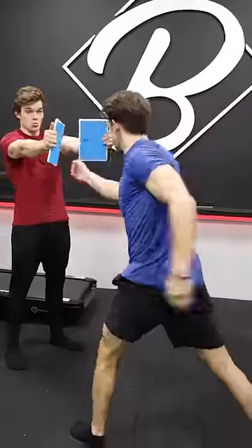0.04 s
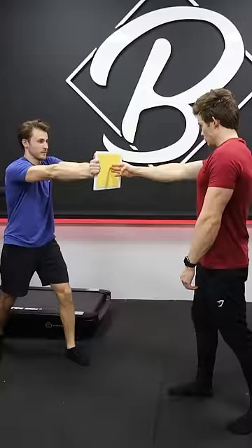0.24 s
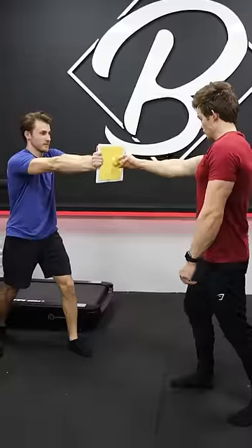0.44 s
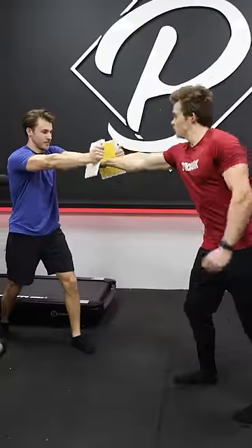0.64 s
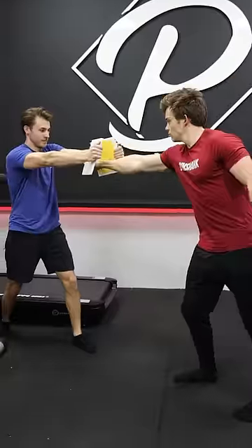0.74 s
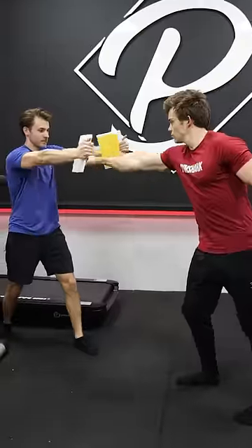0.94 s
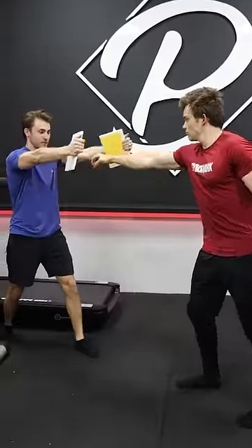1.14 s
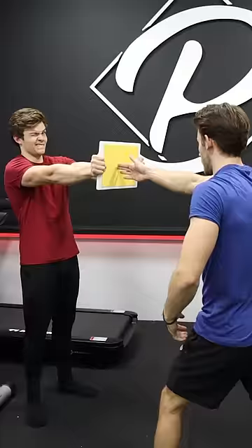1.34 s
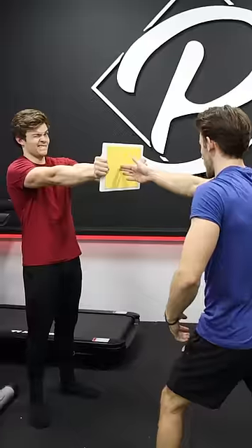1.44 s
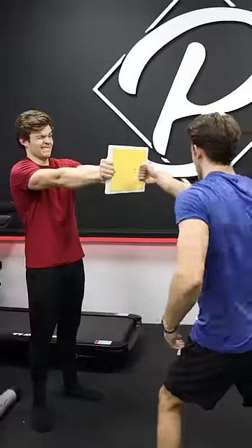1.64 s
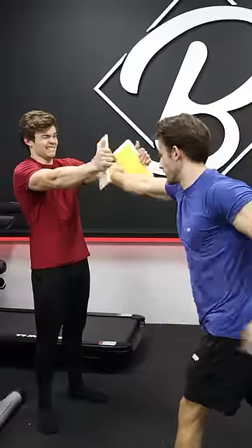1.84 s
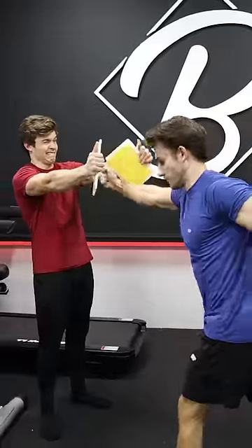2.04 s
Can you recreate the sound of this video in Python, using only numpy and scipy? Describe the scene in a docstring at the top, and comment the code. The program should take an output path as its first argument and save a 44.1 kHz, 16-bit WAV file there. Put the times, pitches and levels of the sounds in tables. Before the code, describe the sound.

Two wooden boards crack under punches in an echoing gym. First a faint echo fades and cuts off at 0.3 seconds as feet shift over a ventilation hum. At 0.6 seconds a fist thuds and a board snaps, splintering with a brief hollow ring. After a clothing rustle and light pat, the second board breaks at 1.8 seconds, followed by two soft steps around 2 seconds.

```python
"""Two wooden practice boards are punched in half in a reverberant gym. First, over a ventilation hum,
the echo of an earlier break dies away and is cut off while feet shift on the mats. At 0.6 s a fist
thuds, the bent board snaps, fibres splinter and the freed halves ring. The snap overloads a gain
control, which holds up the echo as it recovers. After a rustling wind-up and a pat on the board,
the second breaks the same way at 1.8 s, and two steps follow."""
import sys
import numpy as np
from scipy import signal
from scipy.fft import rfft, irfft, next_fast_len
from scipy.io import wavfile
from scipy.ndimage import map_coordinates

SR = 44100
rng = np.random.default_rng(int(sys.argv[2]) if len(sys.argv) > 2 else 0)


def generate_wav(signal):
    """Clip the signal to [-1, 1] and save it as 16-bit WAV at the path in sys.argv[1]."""
    frames = np.transpose(np.atleast_2d(signal))
    scaled = np.clip(frames, -1, 1) * 32767
    pcm = np.round(scaled).astype(np.int16)
    wavfile.write(sys.argv[1], SR, pcm)


N = 92698
TIME = np.arange(N) / SR
HIT = np.arange(SR // 4) / SR  # time within one impact

# each board gives way: t/s, snap/dB, splinter/dB, ring/dB, air push/dB, pitch ratio
FRACTURES = [(0.6410, 15.5, 4, 3.5, -6, 1.0), (1.8116, 14.5, 7.5, 4.5, -5, 1.001)]


def amp(db):
    """Amplitude ratio of a level in decibels."""
    return 10 ** (np.asarray(db) / 20)


def unit(x):
    """Normalisation to rms 1."""
    return x / np.sqrt(np.mean(x ** 2) + 1e-20)


def along(points, hz):
    """Interpolation of (f/Hz, value) points on a logarithmic frequency axis."""
    f, v = np.transpose(points)
    return np.interp(np.log(hz + 1), np.log(f + 1), v)


def fade(t, t60):
    """Exponential decay by 60 dB in t60 seconds."""
    return amp(-60 * t / t60)


def lowpass(f, corner_hz, order=2):
    """Butterworth magnitude response."""
    return 1 / np.sqrt(1 + (f / corner_hz) ** (2 * order))


def filtered(x, response):
    """Zero-phase filtering: the spectrum of x times a gain of frequency."""
    m = next_fast_len(len(x) + 8192)
    return irfft(rfft(x, m) * response(np.fft.rfftfreq(m, 1 / SR)), m)[:len(x)]


def noise(colour, dull_hz=np.inf, size=N):
    """Spectrally shaped noise of rms 1, softened above dull_hz."""
    white = rng.standard_normal(size)
    return unit(filtered(white, lambda f: amp(along(colour, f)) * lowpass(f, dull_hz)))


def at(s, x):
    """Pure delay of x by s seconds."""
    return np.pad(x, (max(round(s * SR), 0), N))[:N]


def burst(colour, t60, rise_s, dull_hz=np.inf):
    """A broadband transient: noise that rises and dies, with the energy of its envelope."""
    envelope = fade(HIT, t60) * (1 - np.exp(-HIT / rise_s))
    return unit(noise(colour, dull_hz, size=len(HIT)) * envelope) * np.sqrt(np.mean(envelope ** 2))


def ring(hz, t60, size=SR // 4):
    """Free vibration of one damped mode."""
    return np.sin(2 * np.pi * hz * TIME[:size]) * fade(TIME[:size], t60)


def room_tone(waver_db=2.5, waver_per_s=14):
    """Random amplitude modulation makes the ventilation hum waver over a faint rumble and hiss."""
    tones = [(91.5, -66), (183, -77), (237, -77), (382, -79)]  # ventilation: f/Hz, level/dB
    floor = [(12, -35.5), (20, -4), (60, -5), (96, 1), (113, -6.5), (270, -19), (377, -20), (410, -28),
             (976, -30), (1090, -40), (1190, -32), (1330, -40.5), (16000, -35.5)]  # background spectrum: f/Hz, density/dB
    hum = np.zeros(N)
    for hz, db in tones:
        waver = map_coordinates(rng.standard_normal(128), [TIME * waver_per_s], mode="wrap")
        tone = np.sqrt(2) * np.sin(2 * np.pi * (hz * TIME + rng.random()))
        hum += amp(db + waver_db * waver) * tone
    return hum + amp(-61) * noise(floor)


def earlier_echo(cutoff_s=0.31):
    """Free decay of the room after an earlier break: a wash and a low boom that stop abruptly."""
    colour = [(100, -23), (400, -29), (560, -2), (720, -10.5), (950, -3.5), (2200, -7.5), (3500, 0),
              (5500, -9), (8300, -13.5), (10500, -27.5), (15000, -64)]  # spectrum of the wash: f/Hz, density/dB
    resonances = [(1006, 40, 6), (1547, 180, 10.4), (2870, 180, 11.6), (4520, 440, 14.8), (6360, 670, 9.7),
                  (8530, 300, 8)]  # its peaks: f/Hz, width/Hz, gain/dB
    room_modes = [(91, -46.5, 1.65), (136, -50.5, 2.4), (146, -50, 1.25)]  # low boom: f/Hz, level/dB, t60/s
    peaks = lambda f: amp(sum(db / (1 + (2 * (f - hz) / width) ** 2) for hz, width, db in resonances))
    wash = amp(-37) * unit(filtered(noise(colour), peaks)) * fade(TIME, t60=0.74)
    boom = sum(amp(db) * ring(hz, t60, size=N) for hz, db, t60 in room_modes)
    return (wash + boom) * np.clip((cutoff_s - TIME) / 0.0029, 0, 1)


def footsteps():
    """Soft contact: feet on the mats give slowly rising thuds with little treble."""
    steps = [(0.0, -43.5, 110), (0.083, -50, 120), (0.218, -54, 110), (1.405, -60.5, 900),
             (1.621, -61, 700), (1.925, -36, 90.5), (1.986, -25, 648)]  # footfalls: t/s, level/dB, low-pass corner/Hz
    colour = [(30, -16.5), (100, -1.5), (250, -6.5), (600, 1.5), (3000, 2), (15000, -20)]  # footfall spectrum: f/Hz, density/dB
    return sum(at(s, amp(db) * burst(colour, t60=0.22, rise_s=.005, dull_hz=hz)) for s, db, hz in steps)


def rustle():
    """Friction noise of clothes swells with each wind-up."""
    envelope = [(0, -82), (.5, -74), (.61, -72.5), (.7, -81.5), (1.35, -82), (1.43, -70), (1.58, -70.5),
                (1.73, -63.5), (1.79, -61.5), (1.85, -76)]  # course of the rustle: t/s, level/dB
    cloth = [(100, -3), (500, 2.5), (1500, -4), (3800, -8.5), (6000, -12), (15000, -28.5)]  # its spectrum: f/Hz, density/dB
    return amp(np.interp(TIME, *np.transpose(envelope))) * noise(cloth)


def gym(x, gain_db=-4.5, build_s=0.0077):
    """Diffuse reverberation builds quickly and decays at a rate that depends on frequency."""
    decay = [(100, 0.9), (300, 0.6464), (480, 0.2158), (700, 0.5875), (2000, 0.7072), (3700, 0.6924),
             (6000, 0.6623), (9000, 0.5436), (14000, 0.47)]  # reverberation time: f/Hz, t60/s
    colour = [(60, -13), (180, -12.5), (420, -2.5), (700, -1), (1200, -1), (2300, -5.5), (3500, -2.5),
              (6000, -3.5), (9000, -3.5), (15000, -13)]  # spectrum of the echo: f/Hz, gain/dB
    hz, t, spectra = signal.stft(rng.standard_normal(SR), SR, nperseg=256)
    spectra = spectra * fade(t, along(decay, hz)[:, None])
    tail = signal.istft(spectra, SR, nperseg=256)[1][:SR]
    tail = tail * (1 - np.exp(-TIME[:SR] / build_s))
    tail = filtered(tail / np.linalg.norm(tail), lambda f: amp(gain_db + along(colour, f)))
    return signal.fftconvolve(x, tail)[:N]


def punches():
    """Impact noise: the fist thuds and its skin slaps just before the board gives."""
    blows = [(0.6205, -24, 850, -36), (1.7990, -14, 2200, -30)]  # fist meets board: t/s, thud/dB, thud low-pass corner/Hz, slap/dB
    thud_colour = [(40, -14), (200, -0.5), (600, -2.5), (1500, 2), (3000, -0.5), (5000, -11),
                   (16000, -11.5)]  # thud spectrum: f/Hz, density/dB
    slap_colour = [(200, -9), (1500, 0.5), (3500, 4), (6000, -4.5), (9000, -12.5), (16000, -26.5)]  # slap spectrum: f/Hz, density/dB
    out = np.zeros(N)
    for s, thud_db, hz, slap_db in blows:
        thud = amp(thud_db) * burst(thud_colour, t60=0.074, rise_s=.0006, dull_hz=hz)
        slap = amp(slap_db) * burst(slap_colour, t60=0.068, rise_s=.0005)
        out += at(s, thud + slap)
    return out


def knuckles():
    """Impulse excitation: a hard knock within each punch starts a low flexural vibration."""
    contacts = [(0.6233, -16.5, 680), (1.7998, -5, 1340)]  # knuckles bottom out: t/s, level/dB, f/Hz
    flex_modes = [(45, -27, 0.074), (219, -14, 0.044), (418, -15, .05)]  # bent board and holder's arms: f/Hz, level re knock/dB, t60/s
    flex = sum(amp(db) * ring(hz, t60) for hz, db, t60 in flex_modes)
    return sum(at(s, amp(db) * (ring(hz, t60=.009) + flex)) for s, db, hz in contacts)


def splinters(fibres_per_s=5000, spread_db=4):
    """Shot noise: wood fibres tear in a dense, fading run of random clicks."""
    colour = [(100, -15), (400, -10.5), (1000, -5.5), (2000, -2), (3500, -0.5), (5000, -5.5), (7000, -11.5),
              (10000, -21), (16000, -32.5)]  # click spectrum: f/Hz, density/dB
    n = len(HIT)
    tears = rng.random(n) < fibres_per_s / SR
    clicks = tears * rng.choice([-1, 1], n) * amp(spread_db * rng.standard_normal(n))
    return unit(filtered(clicks, lambda f: amp(along(colour, f)))) * fade(HIT, t60=.1)


def breaks(low_cut_hz=170.3):
    """Brittle fracture: each board snaps, splinters, shoves the air and leaves its halves ringing."""
    modes = [(587, -9.5, 0.071), (656, -6, 0.17), (1219.7, -10.5, 0.045), (1487.5, -16, 0.036),
             (1886, 2.5, 0.023), (1946, 1, 0.043), (2590, -2.5, 0.056), (2782, -2.5, 0.035),
             (3264, 3, .015), (3430, -4.5, .025), (3730, 0, .025), (4620, -11.5, 0.024), (5060, -14, .025)]  # ring of the halves: f/Hz, level/dB, t60/s
    snap_colour = [(100, -12), (500, -10), (1500, -10), (2400, -11), (3400, 5.5), (4600, -7), (7000, -13),
                   (10000, -22.5), (16000, -27)]  # snap spectrum: f/Hz, density/dB
    # a high-pass thins everything in the crack below about 170 Hz
    low_cut = signal.butter(2, low_cut_hz, "high", fs=SR, output="sos")
    out = np.zeros(N)
    for s, snap_db, splinter_db, ring_db, push_db, pitch in FRACTURES:
        halves = sum(rng.choice([-1, 1]) * amp(db) * ring(hz * pitch, t60) for hz, db, t60 in modes)
        halves = halves * (1 - np.exp(-HIT / 0.00073))
        snap = amp(snap_db) * burst(snap_colour, t60=.01, rise_s=0.000461)
        push = amp(push_db) * ring(hz=194, t60=.03)
        crack = snap + amp(splinter_db) * splinters() + amp(ring_db) * halves + push
        out += at(s, signal.sosfilt(low_cut, crack))
    return out


def lingering():
    """Light damping lets one faint tone outlast the echo of each break."""
    return sum(at(s, amp(-37) * ring(hz=1055, t60=1.1, size=N)) for s, *_ in FRACTURES)


def walls(x):
    """Early reflections, softened in the treble, thicken the crack."""
    paths = [(.0073, -15), (.0104, -8), (0.0124, -13), (.0168, -17)]  # nearest walls: delay/s, gain/dB
    reflections = sum(amp(db) * at(s, x) for s, db in paths)
    return filtered(reflections, lambda f: lowpass(f, corner_hz=6030))


def knocks(rise_s=0.005):
    """Free vibration: a freed half sounds a hollow note in its lowest modes."""
    swings = [(0.6620, 8, 1.0), (1.8160, 12.5, 1.005)]  # a half swings out: t/s, level/dB, pitch ratio
    modes = [(592, -17, .06), (665, -7, .04), (697, -1, 0.059)]  # its low modes: f/Hz, level/dB, t60/s
    onset = 1 - np.exp(-HIT / rise_s)
    note = lambda pitch: sum(amp(db) * ring(hz * pitch, t60) for hz, db, t60 in modes)
    return sum(at(s, amp(db) * note(pitch) * onset) for s, db, pitch in swings)


def pat():
    """Light impact: a hand pats the second board before the blow."""
    touches = [(1.657, -47.5)]  # hand meets board: t/s, level/dB
    colour = [(100, -21), (600, 3.5), (1300, -20), (1950, 4.5), (2600, -12), (4000, 2), (6000, -8.5),
              (8000, -5.5), (15000, -25.5)]  # pat spectrum: f/Hz, density/dB
    return sum(at(s, amp(db) * burst(colour, t60=0.065, rise_s=0.00073)) for s, db in touches)


def scene(directions=4):
    """Superposition: the boards radiate a different crack in each direction and the gym mixes them."""
    cracks = [breaks() for _ in range(directions)]
    people = punches() + knuckles() + pat() + footsteps() + rustle()
    knock = knocks()
    early = cracks[0] + walls(cracks[1]) + people + knock
    echo = sum(gym(crack) for crack in cracks) / np.sqrt(directions)
    echo += gym(people + amp(-3.5) * knock)
    return (early + echo + lingering() + earlier_echo() + room_tone())[None]


def record(dry, limit_db=-11.5, sense_s=0.0034, attack_s=0.001, recover_db_per_s=81.5, ceiling_db=-3):
    """Automatic gain control ducks a moment late and recovers steadily; what slips past saturates."""
    lag = lambda v, s: signal.lfilter([1 - np.exp(-1 / (s * SR))], [1, -np.exp(-1 / (s * SR))], v)
    level_db = 10 * np.log10(lag(dry[0] ** 2, sense_s) + 1e-12)
    over_db = np.maximum(level_db - limit_db, 0)
    recovery_db = recover_db_per_s * TIME
    held_db = np.maximum.accumulate(over_db + recovery_db) - recovery_db
    ducked = dry[0] * amp(-lag(held_db, attack_s))
    saturated = ducked / (1 + (ducked / amp(ceiling_db)) ** 6) ** (1 / 6)
    return filtered(saturated, lambda f: lowpass(f, corner_hz=16000, order=60))[None]


dry = scene()
out = record(dry)
generate_wav(out)
```